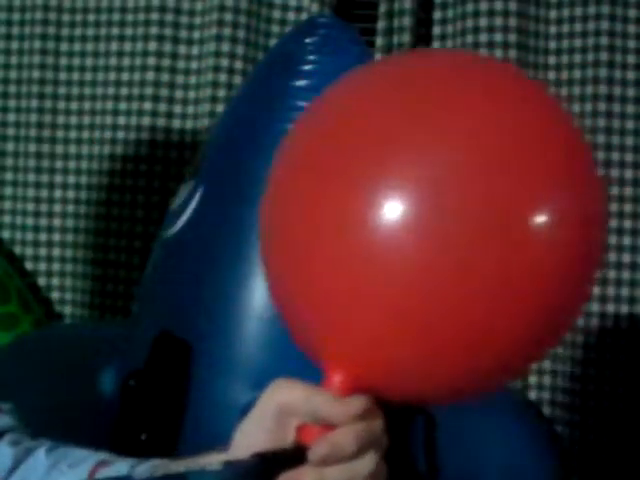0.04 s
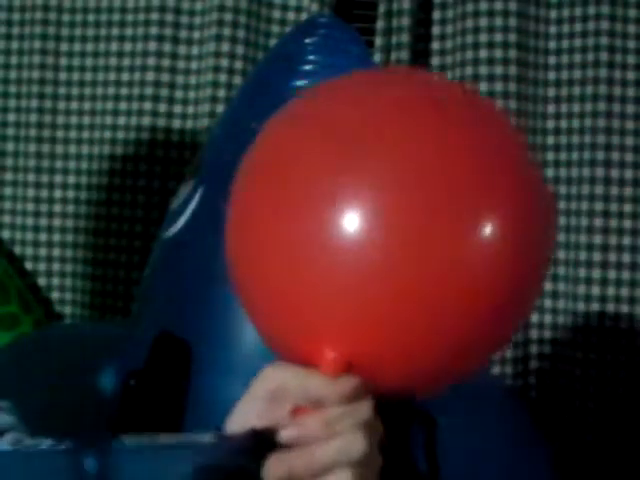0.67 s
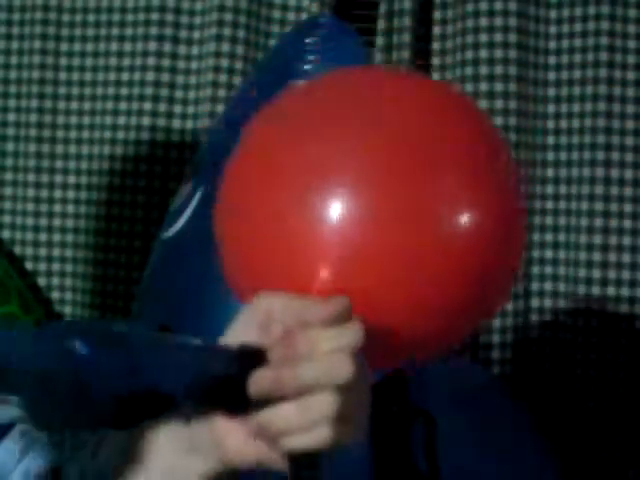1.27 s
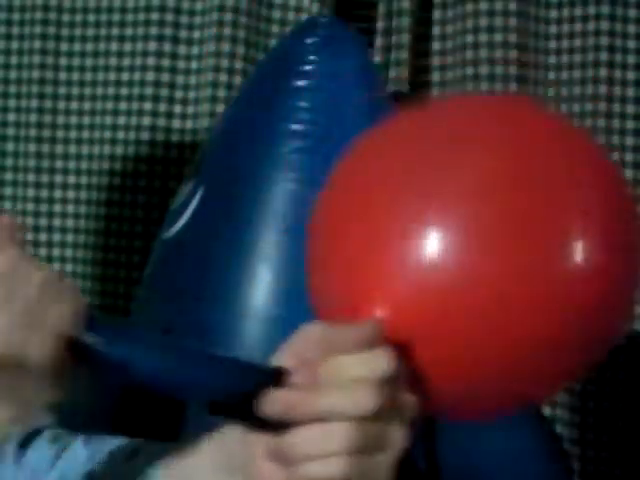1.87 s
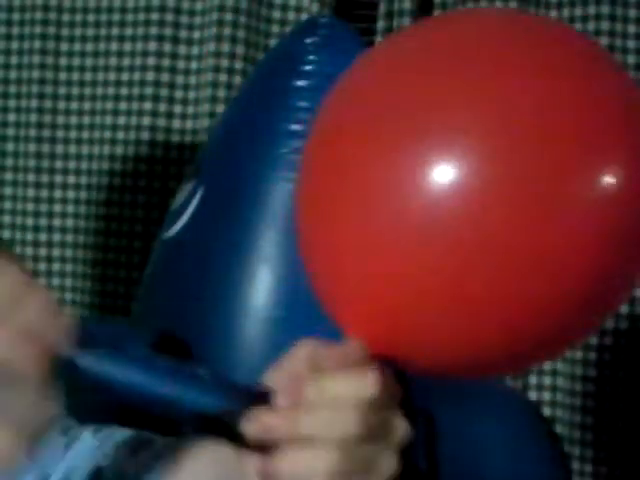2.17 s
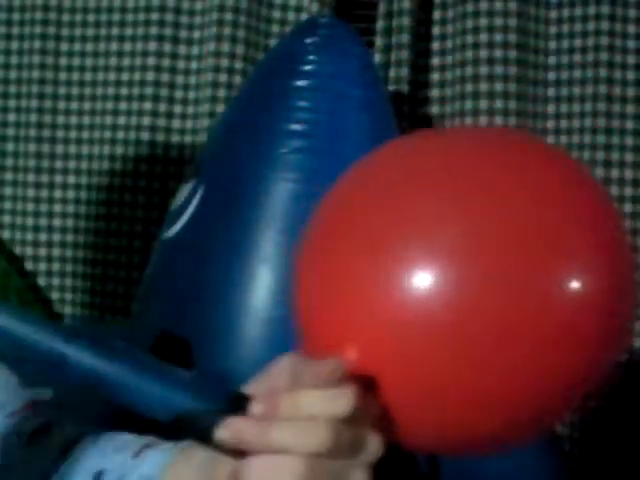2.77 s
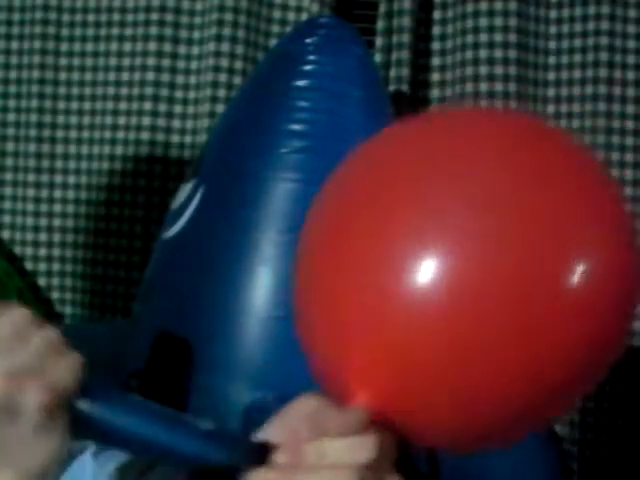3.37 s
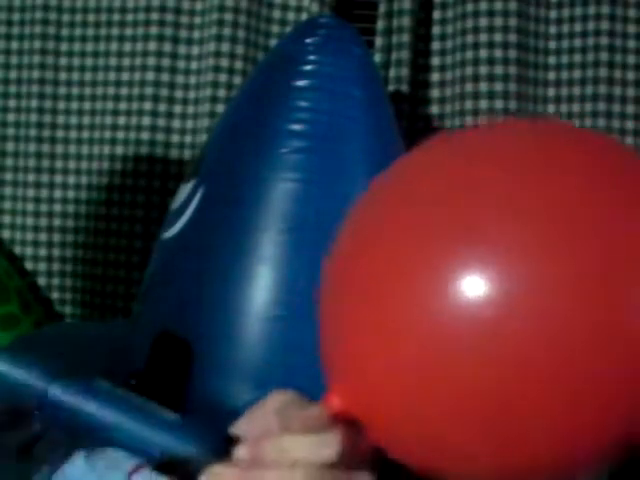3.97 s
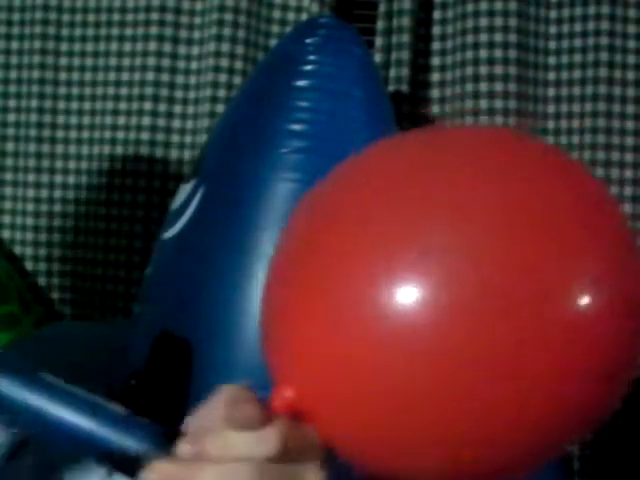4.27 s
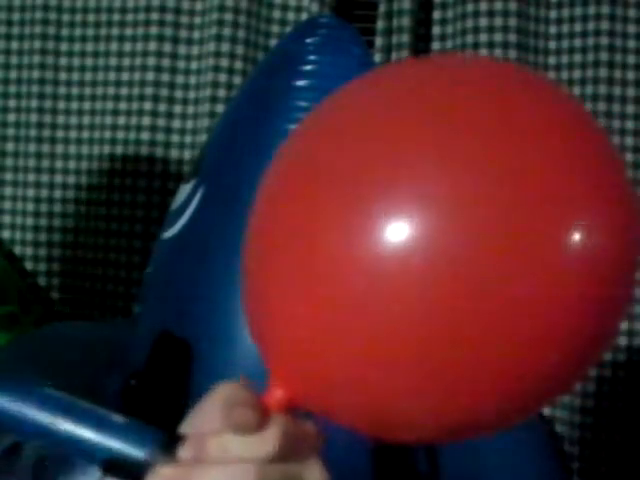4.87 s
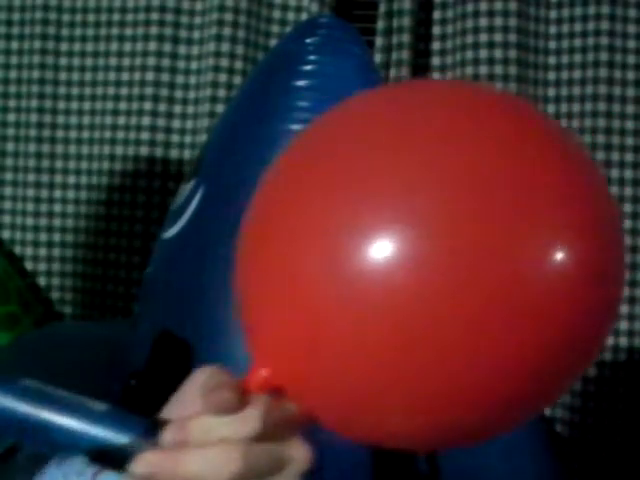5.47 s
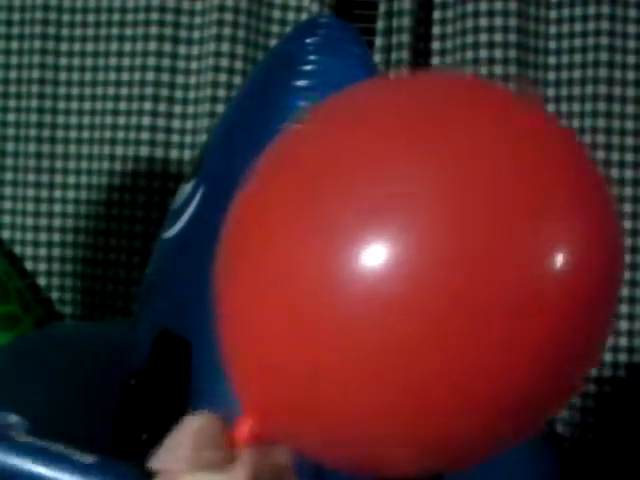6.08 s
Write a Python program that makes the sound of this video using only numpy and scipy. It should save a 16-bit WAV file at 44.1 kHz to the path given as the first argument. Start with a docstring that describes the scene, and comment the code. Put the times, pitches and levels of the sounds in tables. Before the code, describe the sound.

A hand pump fills a balloon close to the microphone in a small, quiet room. After a faint puff of air and a plastic clack, hissing strokes follow steadily, between two and three a second. Each push nearly whistles through the nozzle, and each pull sucks air in more softly. The piston rubs faintly and clacks at the end of some strokes, while hands softly bump the pump and balloon.

```python
"""A faint breath of air and a plastic clack, then hiss after hiss: a hand pump fills a balloon,
about 2.6 strokes a second, close to a stereo pair of microphones in a small curtained room.
Each push jets through the nozzle and nearly whistles; each pull sucks air in more softly.
The piston rubs in the barrel and clacks at the ends of some strokes, and the hands bump
the pump and the balloon. Quiet room tone and very faint pips lie underneath."""
import sys
import numpy as np
from scipy import signal
from scipy.fft import rfft, irfft, next_fast_len
from scipy.io import wavfile
from scipy.ndimage import uniform_filter1d, map_coordinates

SR = 44100
rng = np.random.default_rng(int(sys.argv[2]) if len(sys.argv) > 2 else 0)


def inscribe(sig):
    """Save sig as 16-bit PCM at rate SR to the path in sys.argv[1].

    A 1-D sig is mono; a 2-D sig holds one channel per row.
    Samples are clipped to [-1, 1] before scaling.
    """
    pcm = np.round(np.clip(np.atleast_2d(sig).T, -1, 1) * 32767)
    wavfile.write(sys.argv[1], SR, pcm.astype(np.int16))


N = 275184


def amp(db):
    """Decibels to gain."""
    return 10 ** (np.asarray(db) / 20)


def along(points, hz):
    """Read (frequency_hz, value) points on a log frequency axis."""
    point_hz, values = np.transpose(points)
    return np.interp(np.log(hz + 1), np.log(point_hz + 1), values)


def curve(points):
    """Join (time_s, value) points into one value per sample."""
    times, values = np.transpose(points)
    return np.interp(np.arange(N) / SR, times, values)


def wobble(rate_hz):
    """A smooth random curve with rate_hz knots a second."""
    knots = rng.standard_normal(int(N * rate_hz / SR) + 4)
    coarse = np.linspace(0, N, int(8 * N * rate_hz / SR) + 2)
    return np.interp(np.arange(N), coarse, map_coordinates(knots, [coarse * rate_hz / SR]))


def filtered(x, response):
    """Pass x through a complex response of frequency."""
    n = x.shape[-1]
    padded = next_fast_len(n + SR // 5)
    return irfft(rfft(x, padded) * response(np.fft.rfftfreq(padded, 1 / SR)), padded)[..., :n]


def resonances(modes, f):
    """Causal response of (pitch_hz, width_hz, level_db) modes, alternating in sign."""
    return sum((-1) ** k * amp(db) * 1j * f * width / (hz * hz - f * f + 1j * f * width)
               for k, (hz, width, db) in enumerate(modes))


def add(track, start_s, sound):
    """Mix a sound into the track from start_s on."""
    part = track[max(round(start_s * SR), 0):][:len(sound)]
    part += sound[:len(part)]


def flow(t, rise_s, fall_s, roundness=1.73):
    """Air flow of one stroke around t = 0: a rounded top with exponential flanks."""
    from_peak = t / np.where(t < 0, rise_s, fall_s)
    return amp(-30 * (np.sqrt(1 + from_peak ** 2 / roundness) - 1))


def strokes(rows, rise_s, fall_s, lag_s):
    """One swell per stroke, lag_s after its fastest flow; louder strokes swell more."""
    level, t = np.zeros(N), np.arange(-SR // 2, SR // 2) / SR
    swell = flow(t - lag_s, rise_s, fall_s)
    loudest_db = max(row[1] for row in rows)
    for peak_s, db, *_ in rows:
        add(level, peak_s + t[0], amp((db - loudest_db) / 2) * swell)
    return level


# How alike diffuse sound is at the two microphones: frequency_hz, correlation
MIC_LIKENESS = [(100, 0.8), (600, 0.59), (1300, 0.83), (2400, 0.81), (4400, 0.54), (8000, 0.24),
                (15000, 0.04)]

def diffuse(pair, response=np.ones_like):
    """Two unrelated signals, coloured, at closely spaced microphones: alike except in the treble."""
    def spread(hz):
        angle = np.arccos(np.clip(along(MIC_LIKENESS, hz), -1, 1)) / 2
        return response(hz) * np.array([np.cos(angle), np.sin(angle)])
    mid, side = filtered(pair, spread)
    return np.array([mid + side, mid - side])


def noise(response):
    """Coloured noise of rms 1 at the microphones, scattered by the room."""
    x = diffuse(rng.standard_normal((2, N)), response)
    return x / x.std()


def rush(spectrum):
    """Diffuse noise of rms 1 with a (frequency_hz, level_db) spectrum."""
    return noise(lambda hz: amp(along(spectrum, hz)))


# Reverberation of the small curtained room: frequency_hz, t60_s
WALL_DECAY = [(120, 0.12), (500, 0.24), (1800, 0.19), (5000, 0.22), (9000, 0.083), (15000, 0.049)]

def room(x, wet_db, build_s=0.0047):
    """The direct sound plus the short diffuse answer of the walls."""
    hz, t, bands = signal.stft(rng.standard_normal((2, SR // 4)), SR, nperseg=256)
    t60 = along(WALL_DECAY, hz)[:, None]
    tail = signal.istft(bands * amp(-60 * t / t60) / np.sqrt(t60), SR, nperseg=256)[1]
    onset = np.clip(np.arange(tail.shape[1]) / SR / build_s - .5, 0, 1)
    tail = diffuse(tail * onset)
    tail /= np.linalg.norm(tail[0])
    wet = signal.oaconvolve(np.atleast_2d(x), tail, axes=1)[:, :x.shape[-1]]
    return (x + amp(wet_db) * wet) / np.hypot(1, amp(wet_db))


# The quiet room, all around the microphones: frequency_hz, relative_db
ROOM_SPECTRUM = [(25, -14), (90, 8), (220, -2), (400, 12), (750, 4), (1500, 1.5), (2400, 1), (4000, -1.5),
                 (8000, 0), (15800, -4)]

def room_tone(level_db=-61):
    """A faint, steady rush, strongest in the low mids."""
    return amp(level_db) * rush(ROOM_SPECTRUM)


def pips(rate_hz=9.9, pitch_hz=2330, width_hz=330, level_db=-65):
    """Very faint high pips repeat steadily under everything."""
    phase = 2 * np.pi * rate_hz * np.arange(N) / SR - np.pi / 6
    gate = np.maximum(np.cos(phase), 0) ** 4
    return amp(level_db) * gate * noise(lambda f: resonances([(pitch_hz, width_hz, 0)], f) ** 2)


# Hands on the pump, close up: frequency_hz, relative_db
GRIP_SPECTRUM = [(20, -18), (45, -13), (75, -4), (110, -1), (145, 2), (200, -9.5), (300, -11.5), (600, -5),
                 (1500, -44)]

def hands(rest_db=-81, push_db=-62, drag_gain_db=-8, waver_db=4):
    """The gripping hands rumble as they brace for each push, and more when the seal drags."""
    bracing = strokes(PUSHES, rise_s=0.15, fall_s=0.068, lag_s=0.015)
    effort = amp(rest_db) + amp(push_db) * bracing
    drag = amp(curve(SEAL_DRAG) + drag_gain_db)
    return np.hypot(effort, drag) * amp(waver_db * wobble(30)) * rush(GRIP_SPECTRUM)


# The balloon's low modes: pitch_hz, width_hz, relative_db
BALLOON_MODES = [(136, 68, 1), (245, 145, -3), (413, 153, 1.5)]
# Soft bumps of hands and piston: start_s, relative_peak_db, relative_tap_db
BUMPS = [(0.299,-51,-13), (0.749,-49,-12), (1.502,-45,-10), (1.811,-32,2.5), (2.029,-44,-23),
         (2.095,-38,-5), (2.864,-35,-14), (3.292,-41,-15), (3.773,-32,1.5), (4.023,-28.5,-23),
         (4.176,-31.5,0.5), (4.392,-43,-19), (4.512,-38,1), (4.61,-32,6), (4.72,-44,-14), (4.999,-31,9),
         (5.191,-38.5,-2), (5.301,-31.5,-10), (5.354,-32.5,12), (5.62,-33.5,-11), (5.715,-31.5,4.5),
         (6.036,-28.5,-6.5)]

def bumps(gain_db=-1, soft_hz=2000):
    """Soft blows thump the balloon, with a dull tap from the pump."""
    out, blow = np.zeros(N), signal.unit_impulse(SR // 10)
    for start_s, peak_db, tap_db in BUMPS:
        modes = BALLOON_MODES + [(770, 270, tap_db - 1.5), (1470, 164, tap_db + 3.5)]
        hit = filtered(blow, lambda f: resonances(modes, f) / (1 + 1j * f / soft_hz) ** 2)
        add(out, start_s + .001, amp(peak_db + gain_db) * hit / np.abs(hit).max())
    return out


# Drag of the seal in the barrel: time_s, relative_db
SEAL_DRAG = [(0.0, -79), (0.9, -79), (1.4, -57), (2.3, -55), (2.95, -49.5), (3.6, -63), (4.3, -63),
             (5.1, -55), (5.45, -67), (6.24, -56.5)]
# The barrel's hollow resonance: time_s, pitch_hz
BARREL_NOTE = [(0.0, 453.7), (2.25, 467.8), (2.95, 562.2), (3.9, 457.5), (5.05, 508.7), (6.24, 464)]
# The rubbing seal, heard from beside the barrel: frequency_hz, relative_db
RUB_SPECTRUM = [(120, -22), (280, -39), (420, 6.5), (560, -4), (900, 0.5), (1300, -2), (1900, 1),
                (3000, -56), (6000, -35)]

def piston_rub(rub_db=-2, hollow_db=-2.5, half_width_hz=80, pull_db=-2, turning_db=-12, judder_db=1.5):
    """The seal rubs on every stroke and eases at the turns; the barrel's hollow note wanders."""
    pushing = strokes(PUSHES, rise_s=0.14, fall_s=0.062, lag_s=0.057)  # late, as the pressure builds
    pulling = strokes(PULLS, rise_s=0.095, fall_s=0.043, lag_s=-0.015)
    speed = amp(turning_db) + pushing + amp(pull_db) * pulling
    phase = 2 * np.pi * np.cumsum(curve(BARREL_NOTE)) / SR
    hollow = noise(lambda f: 1 / (1 + (f / half_width_hz) ** 2)) * np.sqrt(2) * np.cos(phase)
    drag = amp(curve(SEAL_DRAG) + judder_db * wobble(35))
    return drag * speed * (amp(rub_db) * rush(RUB_SPECTRUM) + amp(hollow_db) * hollow)


# Air entering the intake: frequency_hz, relative_db
INTAKE_SPECTRUM = [(200, -33), (700, -10), (1050, -9.5), (1450, 2), (2200, 0.5), (3100, 3), (4000, 1),
                   (6000, 3.5), (7300, -6.5), (8800, -4), (10500, 0), (13500, 0), (15800, -1)]
# Back strokes: fastest_flow_s, relative_db, rise_s
PULLS = [(0.43, -62.5, 0.14), (0.668, -51.5, 0.023), (0.8, -63, 0.11), (1.201, -49, 0.063),
         (1.574, -51, 0.098), (1.983, -49, 0.075), (2.35, -49, 0.078), (2.756, -46.5, 0.068),
         (3.144, -45.5, 0.058), (3.516, -45, 0.055), (3.914, -46.5, 0.065), (4.324, -46.5, 0.07),
         (4.737, -43, 0.068), (5.118, -45.5, 0.052), (5.466, -45, 0.066), (5.845, -46.5, 0.053),
         (6.219, -44.5, 0.062)]

def pulls(gain_db=5, flutter_db=1.7, fall_over_rise=0.87):
    """Air is sucked through the intake as the piston goes back."""
    level, t = np.zeros(N), np.arange(-SR // 3, SR // 3) / SR
    for peak_s, db, rise_s in PULLS:
        add(level, peak_s + t[0], amp(db) * flow(t, rise_s, fall_over_rise * rise_s))
    return level * amp(gain_db + flutter_db * wobble(60)) * rush(INTAKE_SPECTRUM)


# The struck pump's casing, low thud and bright crack: pitch_hz, width_hz, relative_db
CASING_MODES = [(1410, 240, -6.5), (2320, 770, -3.5)]
THUD_MODES = [(142, 75, 0), (398, 85, 5.5), (900, 190, -1)]
CRACK_MODES = [(3900, 1100, -6.5), (5060, 2300, 1), (5197, 200, 7.5), (11100, 3000, -12.5)]
# A shallow dip in the treble of every clack: centre_hz, width_hz, subtracted_level_db
TREBLE_DIP = [(8400, 1200, -14)]
# The piston at its stops, close to the microphones, and at 1.288 s and 2.456 s the valve clicking as a push
# begins; all levels are relative: start_s, peak_db, barrel_hz, rod_hz, rod_db, casing_db, crack_db, thud_db
CLACKS = [(0.661,-21.5,1370,3120,-5,0.5,-18.5,-20), (1.026,-8.5,1890,3400,-5.5,2,-22,-29.5),
          (1.196,-24,2020,3320,-5.5,0,-20.5,-29), (1.288,-31,1400,3180,-2,0,-2,1),
          (1.42,-24.5,1400,2870,-14,-1,-30,-27), (1.503,-16,1930,3200,-4.5,-4,-20.5,-36),
          (2.286,-12.5,1610,3060,-8,-14,-36,-59), (2.456,-31,1500,3100,-13,0,-6,-14),
          (2.574,-7.5,1720,3300,-10.5,-1,-18.5,-44), (2.985,-13.5,1670,3080,-17,-0.5,-23,-33),
          (3.366,-13.5,1340,3220,-30,-0.5,-14,-28), (4.7742,-3,1880,3190,-12,-2.5,-21.5,-33.5),
          (5.297,-6,1480,3270,-7.5,1.5,-13.5,-40)]

def clacks(rebound_s=0.001802, rebound=0.52, chatter=0.033, chatter_t60_s=0.016, soft_hz=4500,
           gain_db=-1.07):
    """The piston hits its stop, or the valve clicks as a push begins; each hit rebounds and chatters, and the
    damped plastic rings for milliseconds."""
    out, t = np.zeros((2, N)), np.arange(SR // 5) / SR
    for row, jitter in zip(CLACKS, rng.standard_normal((len(CLACKS), len(t)))):
        start_s, peak_db, barrel_hz, rod_hz, rod_db, casing_db, crack_db, thud_db = row
        blow = signal.unit_impulse(len(t)) + chatter * jitter * amp(-60 * t / chatter_t60_s)
        bounce_s = abs(rebound_s * (1 + .15 * jitter[-1]))
        blow[round(bounce_s * SR)] += rebound

        def plastic(f):
            barrel = resonances([(barrel_hz, 380, 0)], f)
            rod = resonances([(rod_hz, 430, rod_db + 11)], f)
            casing = amp(casing_db) * resonances(CASING_MODES, f)
            thud = amp(thud_db + 16) * resonances(THUD_MODES, f)
            body = (barrel + rod + casing + thud) / (1 + 1j * f / soft_hz) ** 2
            crack = amp(crack_db + 7) * resonances(CRACK_MODES, f)  # hard contacts reach the treble
            return (body + crack) * (1 - resonances(TREBLE_DIP, f))

        hit = filtered(blow, plastic)
        # The pump moves, so the walls answer each clack anew.
        at_mics = room(hit / np.abs(hit).max(), wet_db=-5.5)
        for track, heard in zip(out, at_mics):
            add(track, start_s + .0007, amp(peak_db + gain_db) * heard)
    return out


def shifting(hiss, depth_db):
    """A hiss ripples in colour, more in the treble, as the hand and the balloon move around it."""
    hz, _, bands = signal.stft(hiss, SR, nperseg=512)
    ripple = uniform_filter1d(rng.standard_normal(bands.shape[1:]), size=5, axis=0)  # across frequency
    ripple = uniform_filter1d(ripple, size=36, axis=1)  # across time
    band_depth_db = depth_db * np.minimum(hz / 7000, 1)[:, None]
    out = signal.istft(bands * amp(band_depth_db * ripple / ripple.std()), SR, nperseg=512)[1][:, :N]
    return out / out.std()


# The jet at the nozzle, close up: frequency_hz, relative_db
JET_SPECTRUM = [(50, -21), (135, -10), (270, -19.5), (450, -13), (1080, -13.5), (1400, -2), (1900, 0),
                (2600, 4.5), (3600, 3), (6200, 1.5), (7900, -3.5), (10300, 1.5), (12700, 0), (15800, -3.5)]
# Forward strokes: fastest_flow_s, relative_db, rise_s, nozzle_hz, relative_nozzle_db, edge_tone_hz
PUSHES = [(0.98, -30.5, 0.053, 3140, -16.5, 12500), (1.365, -30, 0.033, 2850, -15.5, 10900),
          (1.761, -28, 0.041, 3210, -8, 11900), (2.183, -28, 0.037, 3240, -9, 12300),
          (2.54, -28.5, 0.04, 3150, -8, 10500), (2.943, -28.5, 0.041, 3210, -9.5, 11200),
          (3.33, -25.5, 0.036, 3220, -6, 11060), (3.709, -27.5, 0.039, 3200, -10.5, 12100),
          (4.104, -27.5, 0.039, 2790, -13, 11760), (4.537, -28, 0.036, 3215, -12.5, 9880),
          (4.935, -27.5, 0.05, 2590, -12.5, 12700), (5.254, -27, 0.029, 2670, -10, 10000),
          (5.643, -30, 0.036, 3110, -13.5, 12400), (6.018, -26.5, 0.028, 3300, -10, 10100)]

def pushes(hiss_gain_db=1.5, nozzle_gain_db=5.5, flutter_db=1.0, valve_close_s=0.045):
    """A turbulent jet; the nozzle's resonance and a high edge tone nearly whistle as the flow peaks."""
    level, whistle = np.zeros(N), np.zeros(N)
    t = np.arange(-SR // 5, SR // 5) / SR
    for peak_s, db, rise_s, nozzle_hz, nozzle_db, edge_hz in PUSHES:
        speed = flow(t, rise_s, valve_close_s)  # back pressure ends every push alike
        add(level, peak_s + t[0], amp(db) * speed)
        edge_db = -16.5 + 1.5 * peak_s  # the edge tone grows as the balloon fills
        for hz, width_hz, ring_db in [(nozzle_hz, 280, nozzle_db + nozzle_gain_db),
                                      (edge_hz, 660, edge_db)]:
            ring = filtered(rng.standard_normal(len(t)), lambda f: resonances([(hz, width_hz, 0)], f) ** 2)
            add(whistle, peak_s + t[0], amp(db + ring_db) * speed ** 2 * ring / ring.std())
    hiss = amp(hiss_gain_db) * level * shifting(rush(JET_SPECTRUM), depth_db=1.5)
    return (hiss + whistle) * amp(flutter_db * wobble(160))


# The pump's place, left of centre between the microphones: frequency_hz, left_over_right_db
LEFT_LEAN = [(100, 1), (700, 1), (2200, 2), (4500, 1.9), (13000, 0.9)]

def scene():
    """Pump and balloon close by and a little to the left, over faint room tone and pips."""
    air = room(pushes() + pulls(), wet_db=-6.5)
    pump = air + clacks() + room(bumps(), wet_db=-5) + piston_rub() + hands()
    placed = filtered(pump, lambda hz: amp(np.outer([.5, -.5], along(LEFT_LEAN, hz))))
    return placed + room_tone() + pips()


def record(dry, top_hz=15900):
    """The recorder keeps nothing above its band limit."""
    return filtered(dry, lambda hz: hz < top_hz)


dry = scene()
out = record(dry)
inscribe(out)
```